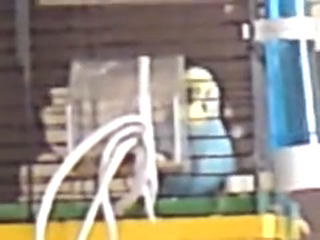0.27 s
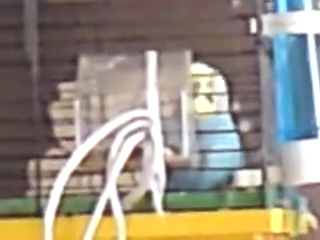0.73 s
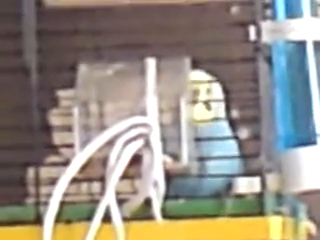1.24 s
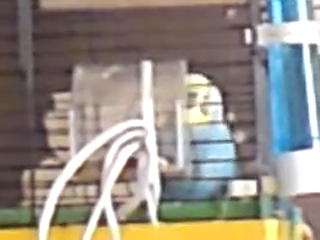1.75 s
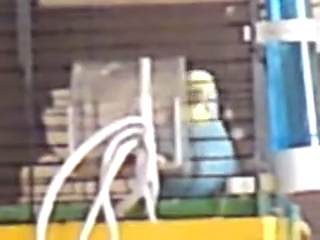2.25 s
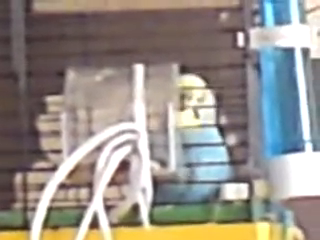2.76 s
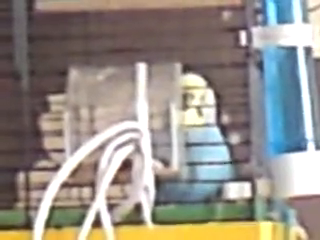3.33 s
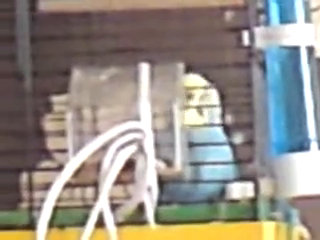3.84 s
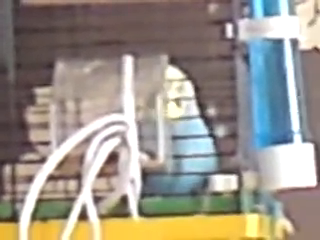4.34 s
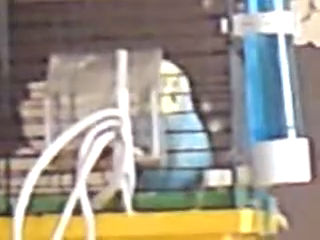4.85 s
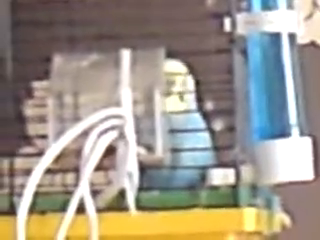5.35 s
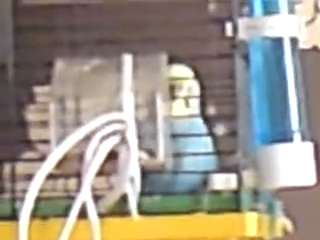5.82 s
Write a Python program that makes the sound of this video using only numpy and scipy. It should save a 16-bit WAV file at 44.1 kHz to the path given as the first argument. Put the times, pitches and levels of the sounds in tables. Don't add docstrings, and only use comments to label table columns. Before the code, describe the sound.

A caged budgerigar rasps harshly, then gives spaced rising chirps, quick warbles and beak clicks in a small hard room, over soft hiss.

```python
import sys
import numpy as np
from scipy import signal
from scipy.fft import rfft, irfft
from scipy.io import wavfile
from scipy.ndimage import uniform_filter1d

SR = 44100
rng = np.random.default_rng(int(sys.argv[2]) if len(sys.argv) > 2 else 0)


def dump_mix(stems):
    frames = np.atleast_2d(stems).T
    limited = np.clip(frames, -1, 1)
    pcm = np.round(limited * 32767).astype(np.int16)
    wavfile.write(sys.argv[1], SR, pcm)


def magnitude_from_level(level_db):
    exponent = np.asarray(level_db, float) / 20
    return 10 ** exponent


N = 268524

# f/Hz, level/dB
HISS = [(130, -2), (641, -9), (1200, -13), (1400, -14), (1930, -13.5), (2850, -17.5), (3160, -17),
        (7500, -20.5)]
HISS_DB = -46
# f/Hz, bandwidth/Hz, level/dB
HUM = [(46.3, 9.2, -63.5), (94, 8.6, -81), (259.7, 55, -58)]

# t/s, duration/s, chest level/dB, throat level/dB, beak level/dB
RASPS = [
    (0.008, 0.13, -22, -22.5, -26),
    (1.07, 0.22, -47, -41, -48.5),
    (2.848, 0.13, -26.5, -14, -6),
    (3.19, 0.066, -47.5, -65, -73),
    (3.28, .18, -47.5, -46, -50),
    (3.47, 0.18, -46, -42.5, -55),
]
# t/s, duration/s, chest level/dB, throat level/dB, beak level/dB
MUTTERS = [
    (.185, 0.085, -56, -49.5, -38),
    (.35, .12, -56, -59, -54),
    (4.885, 0.33, -50.5, -50.5, -58),
    (6.048, 0.068, -26.5, -14.5, -13),
]
# f/Hz, bandwidth/Hz, level/dB
CHEST = [(1010, 500, 5.5), (1683, 690, 12)]
THROAT = [(2500, 980, -1.2), (3200, 980, -0.89)]
BEAK = [(4250, 920, -4), (5000, 880, -1.5), (5400, 620, 2), (7050, 3500, -7.5)]
RASP_PEAKS = (0.38, 0.55, 0.51)
# chest, throat, beak (level/dB)
RASP_RISE_DB = (-7.5, -28, -37)
RASP_FALL_DB = (-16.5, -16, -18.5)
RASP_EDGE, MUTTER_EDGE = 0.45, 0.077

# f/Hz, time to fall 60 dB/s
ROOM = [(300, .28), (1000, .285), (2000, .28), (4000, .29), (8000, .26)]
ROOM_DB = 1.5
# t/s, level/dB
ECHOES = [(.0037, -9), (.0077, -10), (.0085, -11), (.0092, -11), (.0152, -12), (.0183, -13), (.0495, -14)]
# f/Hz, bandwidth/Hz, level/dB
STANDING = [(1630, 48, -2.5), (1795, 9.2, 8.5), (2000, 59, -2.5), (2476, 29, 3.5), (2660, 10, -14),
            (3190, 62, 6.5), (3250, 9.7, -5), (3650, 40, 3), (4270, 21, -1), (4820, 31, 5), (5740, 21, 6),
            (5760, 18, -5), (6350, 17, -15.5)]

# t/s, duration/s, top f/Hz, level/dB, octave lift on the way up/dB
CHIRPS = [
    (0.631, 0.2, 1840, -24.5, 0.5),
    (2.157, .17, 1825, -28, -12),
    (3.722, .185, 1872, -27, -1.5),
]
# t/s, duration/s, top f/Hz, level/dB, octave lift on the way up/dB
BROKEN_CHIRPS = [
    (1.555, .185, 1907, -31.5, 8),
    (5.299, .21, 2101, -31, -14),
]
LOW_HZ = 1328
# share of duration, share of the climb (0-1), effort level/dB, roughness (0-1)
CLIMB = [(0, 0, -38, .08), (.22, 0.05, -23, .1), (.45, 0.34, -11.5, 0.2), (.66, .82, -2.5, 0.06),
         (.8, 0.98, 1.5, 0), (1.0, 0.97, -12.5, 0.31)]
BROKEN_CLIMB = [(0, 0, -17, .05), (.08, .06, -21, .05), (.46, .38, -10, .06), (.58, .76, -4.5, 0.21),
                (.74, 1.0, 0, 0.28), (1.0, 0.95, -6.5, .3)]
# f/Hz, level/dB
WINDPIPE = [(1300, -4), (1900, 0), (2600, -10), (3200, -5), (3700, -11), (4300, -6), (5000, -12),
            (6500, -14.5)]
OVERTONE_EFFORT = (0.89, 1.07, 0.44)
OVERTONE_DB = (-0.5, 2.5, -9)
SAG_S, SAG_PITCH, SAG_DB = 0.025, 0.83, -9
# t/s, f/Hz, level/dB, octave level by beak opening/dB
SQUAWK = [
    (3.99, 1574, -25, -20),
    (4.004, 1587, -40, -24),
    (4.04, 1900, -37.5, -14),
    (4.071, 2190, -38, -5.5),
    (4.1, 2600, -43, 0),
    (4.118, 2534, -44, 5),
    (4.133, 2260, -27, -3),
    (4.16, 2176, -47, 4),
    (4.181, 1987, -46, 5),
]
SQUAWK_ROUGH = 0.3
SQUAWK_THIRD_DB, SQUAWK_THIRD_FADE_DB_PER_S = -52, -160

# t/s, duration/s, start f/Hz, end f/Hz, level/dB
CLEAR = [(.493, 0.033, 3200, 3200, -52.5), (.632, 0.046, 1328, 1328, -45.5), (3.722, .04, 1310, 1377, -45),
         (4.303, 0.0317, 3496, 3250, -32.5), (.67, 0.03, 1865, 1690, -46.5), (.925, 0.01, 3200, 3200, -45),
         (1.849, 0.039, 3444, 3218, -21), (2.012, .05, 1460, 1650, -48.5), (2.012, .055, 2945, 3193, -38.5),
         (2.025, .025, 4470, 4560, -48.5), (4.9, .3, 1609, 1602, -53), (5.115, 0.052, 3080, 3120, -56),
         (5.404, 0.044, 3600, 3740, -59)]
HUSKY = [(.378, 0.019, 563, 538, -44), (.434, 0.014, 553, 543, -46), (2.057, 0.067, 2224, 2780, -28),
         (2.11, 0.066, 2652, 2340, -26), (4.146, 0.031, 2208, 1660, -36.5), (4.302, .02, 4110, 3500, -42),
         (4.32, .022, 1250, 1100, -45), (4.497, 0.025, 3390, 3250, -48), (5.605, .02, 3200, 3115, -31.5),
         (5.613, .028, 2908, 2734, -26), (5.815, .05, 1273, 1614, -41.5), (6.047, .027, 2390, 2290, -28.5),
         (6.047, .024, 4690, 5000, -16)]
HARSH = [(2.045, 0.01, 2723, 1860, -32), (2.462, .085, 2720, 2455, -35.5),
         (4.078, 0.047, 2980, 3250, -37.5), (4.08, .04, 5100, 5530, -36), (4.085, .05, 6700, 6960, -46.5),
         (4.115, 0.062, 6100, 5870, -46.5), (4.131, 0.036, 3200, 3110, -41),
         (4.688, 0.0136, 1660, 1820, -34)]
# t into the phrase/s, duration/s, start f/Hz, end f/Hz, level/dB
TUMBLE = [(0, .016, 4320, 3000, -40), (.009, 0.0066, 3250, 2980, -35), (.016, 0.025, 2950, 2607, -30.5),
          (.051, 0.012, 2050, 1700, -32.5), (.054, 0.04, 2560, 2670, -31.5),
          (.075, 0.025, 3940, 3760, -40.5), (.09, 0.036, 2400, 1850, -32.5), (.13, .014, 2860, 3145, -32.5),
          (.144, .017, 3710, 4000, -34.5), (.159, 0.01, 4170, 2170, -33.5), (.179, .02, 2060, 1868, -32),
          (.18, 0.012, 3934, 3850, -38), (.205, 0.014, 2380, 2143, -29.5)]
TINKLE = [(0, .025, 3200, 3180, -42), (.015, 0.011, 4190, 4220, -44), (.03, .016, 2826, 2750, -28.5),
          (.044, .04, 2050, 2000, -35), (.082, .022, 2360, 2500, -35.5)]
# t/s, level/dB
TUMBLES = [
    (2.434, -0.8),
    (5.596, -0.84),
]
TINKLES = [
    (2.713, -0.99),
    (5.877, 0.74),
]
ROUGH_CLEAR, ROUGH_HUSKY, ROUGH_HARSH, ROUGH_TUMBLE, ROUGH_TINKLE = 0.15, 0.47, 0.88, 0.4, 0.12
# t/s, level/dB
SNAPS = [
    (2.65, -36.5),
    (2.736, -38),
    (5.872, -36.5),
    (5.96, -30),
]
SNAP_S, SNAP_FROM_HZ, SNAP_TO_HZ = 0.0065, 5300, 904
# f/Hz, level/dB
OCTAVE = [(1500, -20), (2050, -19), (2500, -30), (4000, -22)]

# t/s, level/dB, tilt/dB per octave
CLICKS = [
    (0.67, -27.5, -10.5),
    (1.838, -27, 0),
    (2.649, -19, -4.5),
    (2.739, -19.5, -4),
    (4.309, -30, -4),
    (4.493, -40.5, 6),
    (5.87, -16.5, -4),
    (5.961, -21, -6.5),
    (6.045, -25, 1.5),
]

# t/s, duration/s, level/dB, fade/dB
SHUFFLES = [
    (1.064, 0.22, -43.5, -1),
    (2.684, 0.05, -43, -22),
    (2.751, 0.031, -40.5, -13),
    (5.866, 0.13, -39.5, -28),
    (5.944, 0.033, -55.5, -2),
]
# f/Hz, level per Hz/dB
CAGE = [(150, -27), (350, 1.5), (600, 1), (850, 4), (1500, -11.5), (3000, -20)]

# t/s, level/dB
KNOCKS = [
    (1.343, -19.5),
    (1.378, -36.5),
]
# f/Hz, level/dB, time to fall 60 dB/s
PERCH = [(180.7, -1.5, 0.15), (261, -2.5, 0.14), (425, -14.5, 0.31), (1250, -2, 0.049)]
# f/Hz, level per Hz/dB
THUD = [(70, -28.5), (140, 6), (250, 1.5), (700, -6), (1300, -10.5), (3000, -21), (5000, -38.5)]

# t into the phrase/s, level/dB, centre f/Hz
TUMBLE_SCRATCH = [(.004, -32, 3436), (.054, -36, 2500), (.124, -52, 2425), (.164, -39, 3350),
                  (.21, -41.5, 2456), (.26, -38, 2000)]
TINKLE_SCRATCH = [(.01, -37.5, 2500), (.065, -47.5, 2188), (.125, -56, 2130)]
# t/s, level/dB, centre f/Hz
LONE_SCRATCH = [(4.687, -43, 1903), (4.72, -41.5, 2146), (4.75, -39.5, 2296)]

# f/Hz, level/dB
MICROPHONE = [(22, -5), (42, -1), (5000, 0), (6500, -2), (7500, -3.5), (8300, -15), (8800, -22.5),
              (9200, -25.5)]

STRAND = rng.standard_normal(N)


def evened(x):
    return x / np.sqrt(np.mean(x ** 2) + 1e-20)


def read(points, hz):
    f, value = np.transpose(points)
    return np.interp(np.log(hz + 1), np.log(f + 1), value)


def add(mix, s, sound):
    part = mix[max(round(s * SR), 0):][:len(sound)]
    part += sound[:len(part)]


def resonate(x, hz, width):
    b, a = signal.iirpeak(hz, hz / width, SR)
    return signal.lfilter(b, a, signal.lfilter(b, a, x))


def coloured(spectrum):
    gain = magnitude_from_level(read(spectrum, np.fft.rfftfreq(N, 1 / SR)))
    return evened(irfft(rfft(rng.standard_normal(N)) * gain, N))


def wobble(s, hz):
    b, a = signal.butter(4, hz, fs=SR)
    return evened(signal.lfilter(b, a, STRAND))[(s * SR).astype(int) % N]


def unroll(rows):
    s, *columns = np.transpose(rows)
    t = np.arange(s[0], s[-1], 1 / SR)
    return t, [np.interp(t, s, c) for c in columns]


def hiss():
    frames, hz = N // 256 + 5, np.fft.rfftfreq(1024, 1 / SR)
    a, b, patches = rng.standard_normal((frames, 513, 3)).T
    patches = uniform_filter1d(patches, size=10, axis=0)
    patches = evened(uniform_filter1d(patches, size=16, axis=1))
    level_db = read(HISS, np.clip(hz, 130, 7500))[:, None] + 0.4 * patches
    noise = signal.istft((a + 1j * b) * magnitude_from_level(level_db), nperseg=1024, noverlap=768)[1]
    return magnitude_from_level(HISS_DB) * evened(noise[:N])


def hum():
    return sum(magnitude_from_level(db) * evened(resonate(rng.standard_normal(N), hz, width)) for hz, width, db in HUM)


def ringing(drive, group):
    return evened(sum((-1) ** k * magnitude_from_level(db) * resonate(drive, hz, width)
                      for k, (hz, width, db) in enumerate(group)))


def rasps():
    slaps = (rng.random(N) < 900 / SR) * magnitude_from_level(5.9 * np.minimum(rng.exponential(1, N), 3))
    drive = evened(slaps - slaps.mean()) + 2.03 * rng.standard_normal(N)
    rings = [ringing(drive, group) for group in (CHEST, THROAT, BEAK)]
    out = np.zeros(N)
    for rows, swells, edge in ((RASPS, True, RASP_EDGE), (MUTTERS, False, MUTTER_EDGE)):
        for s, long, *levels_db in rows:
            at = max(round(s * SR), 0) + np.arange(round(long * SR))
            share = np.linspace(0, 1, len(at))
            sound = 0
            for db, ring, peak, rise_db, fall_db in zip(levels_db, rings, RASP_PEAKS, RASP_RISE_DB, RASP_FALL_DB):
                arc_db = swells * np.interp(share, [0, peak, 1], [rise_db, 0, fall_db])
                sound = sound + magnitude_from_level(db + arc_db) * ring[at % N]
            add(out, s, sound * signal.windows.tukey(len(at), edge))
    return out


def room(x):
    count = SR // 40
    taps = np.zeros(SR // 2)
    taps[np.arange(count) * 20 + rng.integers(0, 20, count)] = rng.choice([-1., 1.], count)
    hz, t, z = signal.stft(taps, SR, nperseg=256)
    decay_db = -60 * (t / read(ROOM, hz)[:, None]) ** 1.6
    tail = signal.istft(z * magnitude_from_level(decay_db), SR, nperseg=256)[1]
    tail = tail * (1 - np.exp(-(np.arange(len(tail)) / SR / 0.0051) ** 2))
    tail = tail / np.linalg.norm(tail)
    for s, db in ECHOES:
        add(tail, s, magnitude_from_level(db) * np.ones(1))
    spectrum = rfft(tail)
    tail = irfft(spectrum / np.sqrt(uniform_filter1d(abs(spectrum) ** 2, size=70)))
    standing = sum(magnitude_from_level(db) * signal.lfilter(*signal.iirpeak(f, f / w, SR), x) for f, w, db in STANDING)
    return signal.fftconvolve(x, tail / np.linalg.norm(tail))[:N] + standing


def sagged(rows):
    s, hz, rough, *partials_db = rows[-1]
    return [*rows, (s + SAG_S, SAG_PITCH * hz, rough, *(np.array(partials_db) + SAG_DB))]


def chirp(course, s, long, top_hz, db, lift_db):
    share, climb, effort_db, rough = np.transpose(course)
    hz = LOW_HZ + (top_hz - LOW_HZ) * climb
    partials = []
    for k, (own_db, follows) in enumerate(zip(OVERTONE_DB, OVERTONE_EFFORT), 1):
        partials.append(db + own_db + follows * effort_db + read(WINDPIPE, k * hz))
    partials[1] = partials[1] + lift_db * np.clip(2 - 2 * climb, 0, 1)
    return sagged(np.transpose([s + long * share, hz, rough, *partials]))


def squawk():
    rows = []
    for s, hz, db, octave_db in SQUAWK:
        third_db = SQUAWK_THIRD_DB + SQUAWK_THIRD_FADE_DB_PER_S * max(s - SQUAWK[2][0], 0)
        rows.append((s, hz, SQUAWK_ROUGH, db, db + octave_db, third_db))
    return sagged(rows)


def sung(phrase, times, level=-1):
    shift = np.eye(len(phrase[0]))
    return [np.array(phrase) + s * shift[0] + db * shift[level] for s, db in times]


def voices():
    out = [(chirp(CLIMB, *row), 0.13) for row in CHIRPS]
    out += [(chirp(BROKEN_CLIMB, *row), 0.13) for row in BROKEN_CHIRPS]
    out.append((squawk(), 0.13))
    snaps = [(s, SNAP_S, SNAP_FROM_HZ, SNAP_TO_HZ, db) for s, db in SNAPS]
    tumbles, tinkles = np.vstack(sung(TUMBLE, TUMBLES)), np.vstack(sung(TINKLE, TINKLES))
    for notes, rough in [(CLEAR, ROUGH_CLEAR), (HUSKY + snaps, ROUGH_HUSKY), (HARSH, ROUGH_HARSH),
                         (tumbles, ROUGH_TUMBLE), (tinkles, ROUGH_TINKLE)]:
        for s, long, from_hz, to_hz, db in notes:
            ends = (s, from_hz), (s + max(long, 0.005), to_hz)
            out.append(([(when, hz, rough, db, db + read(OCTAVE, hz)) for when, hz in ends], 0.45))
    return out


def whistles():
    out, clock = np.zeros(N), np.arange(N) / SR
    waver, flutter = wobble(clock, hz=160), wobble(clock[::-1], hz=160)
    shaking = (wobble(clock + 1, hz=380) + 1j * wobble(clock + 3, hz=380)) / np.sqrt(2)
    for rows, edge in voices():
        t, (hz, rough, *partials_db) = unroll(rows)
        at = (t * SR).astype(int) % N
        phase = 2 * np.pi * np.cumsum(hz * (1 + 0.009 * waver[at])) / SR
        tone = 0
        for k, db in enumerate(partials_db, 1):
            shaken = np.clip(k * rough, 0, 1)
            steady = np.sqrt(1 - shaken ** 2)
            tone = tone + magnitude_from_level(db) * np.exp(1j * k * phase) * (steady + shaken * shaking[at])
        force = magnitude_from_level(2.4 * flutter[at]) * signal.windows.tukey(len(t), edge)
        add(out, t[0], np.sqrt(2) * tone.real * force)
    return out


def clicks():
    out, t, hz = np.zeros(N), np.arange(512) / SR, np.fft.rfftfreq(512, 1 / SR)
    body = hz ** 2 / (hz ** 2 + 500 ** 2) / (1 + (hz / 6200) ** 8)
    octaves = np.log2(np.maximum(hz, 900) / 900)
    for (s, db, tilt_db), grit in zip(CLICKS, rng.standard_normal((len(CLICKS), 512))):
        burst = evened(irfft(rfft(grit) * magnitude_from_level(tilt_db * octaves) * body))
        add(out, s, magnitude_from_level(db - 4.5) * burst * np.exp(-t / 0.0052))
    return out


def shuffles():
    out, rub = np.zeros(N), coloured(CAGE)
    for s, long, start_db, fade_db in SHUFFLES:
        t, (db,) = unroll([(s, start_db), (s + long, start_db + fade_db)])
        hush = rub[(t * SR).astype(int) % N]
        add(out, t[0], magnitude_from_level(db) * hush * signal.windows.tukey(len(t), 0.15))
    return out


def knock():
    out, t = np.zeros(N), np.arange(SR // 4) / SR
    ring = sum(magnitude_from_level(db - 60 * t / t60) * np.sin(2 * np.pi * hz * t) for hz, db, t60 in PERCH)
    thud = magnitude_from_level(-60 * t / 0.11) * coloured(THUD)[:len(t)]
    for s, db in KNOCKS:
        add(out, s, magnitude_from_level(db) * (ring + thud) * (1 - np.exp(-t / 0.0057)))
    return out


def scratch():
    out, clock = np.zeros(N), np.arange(N) / SR
    grit = wobble(clock + 4, hz=770) + 1j * wobble(clock + 5, hz=745)
    tumbles, tinkles = sung(TUMBLE_SCRATCH, TUMBLES, level=1), sung(TINKLE_SCRATCH, TINKLES, level=1)
    for rows in tumbles + tinkles + [LONE_SCRATCH]:
        t, (db, hz) = unroll(rows)
        beat = 1 + 0.3 * np.cos(2 * np.pi * 140 * t)
        carrier = np.exp(2j * np.pi * np.cumsum(hz) / SR)
        band = (grit[(t * SR).astype(int)] * carrier).real
        add(out, t[0], magnitude_from_level(db) * beat * band * signal.windows.tukey(len(t), 0.1))
    return out


def scene():
    cage = magnitude_from_level(-4.5) * (whistles() + scratch() + rasps() + clicks() + knock() + shuffles())
    return (cage + magnitude_from_level(ROOM_DB) * room(cage) + hiss() + hum())[None]


def roll_off(x):
    return signal.sosfilt(signal.butter(12, 8730, fs=SR, output="sos"), x)


def record(dry):
    power_db = 10 * np.log10(abs(uniform_filter1d(dry[0] ** 2, size=1300)) + 1e-12)
    fall_db = np.arange(N) * 18.8 / SR
    held_db = np.maximum.accumulate(power_db + fall_db) - fall_db
    over_db = np.maximum(held_db + 20.5, 0)
    ducked = dry / magnitude_from_level(0.59 * uniform_filter1d(over_db, size=1500))
    rounded = 0.62 * np.tanh(ducked / 0.62)
    response = magnitude_from_level(read(MICROPHONE, np.fft.rfftfreq(2 * N, 1 / SR)))
    mix = irfft(rfft(rounded, 2 * N) * response)[:, :N]
    return roll_off(mix)


dry = scene()
out = record(dry)
dump_mix(out)
```